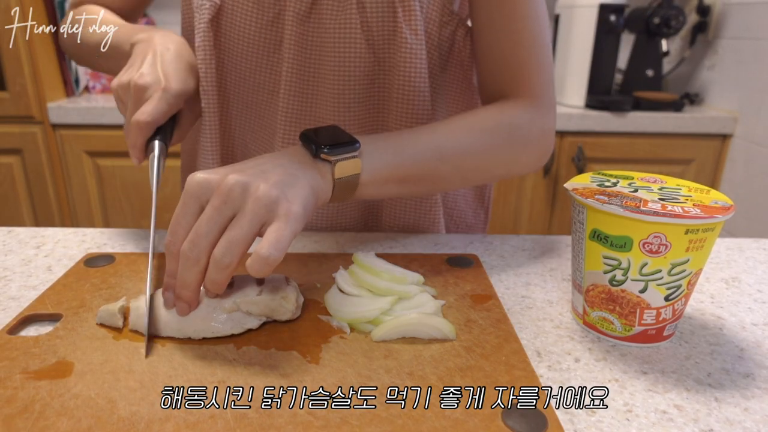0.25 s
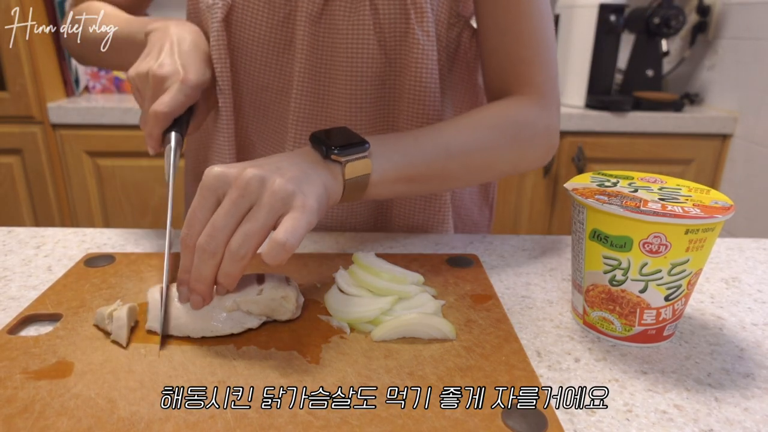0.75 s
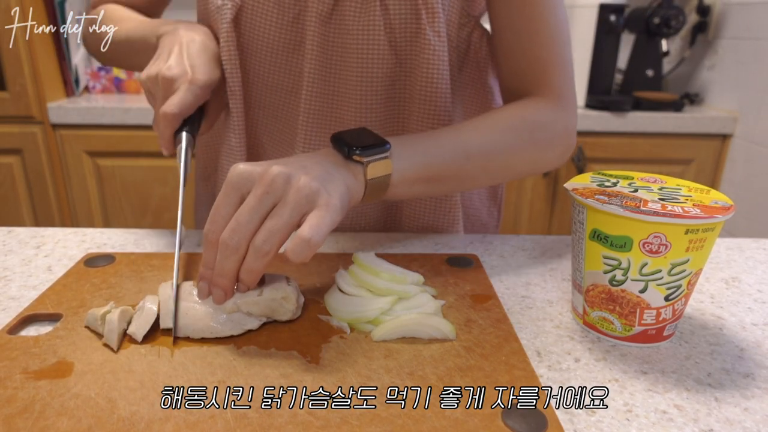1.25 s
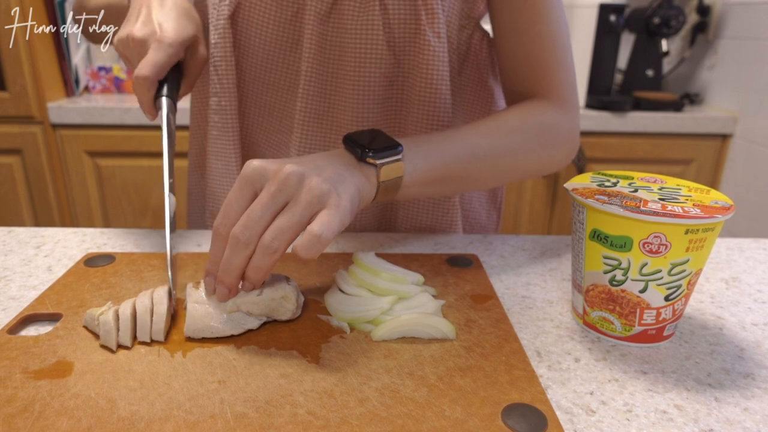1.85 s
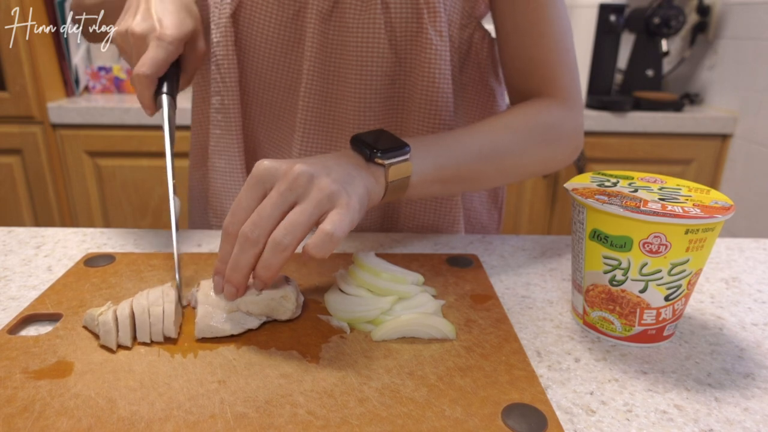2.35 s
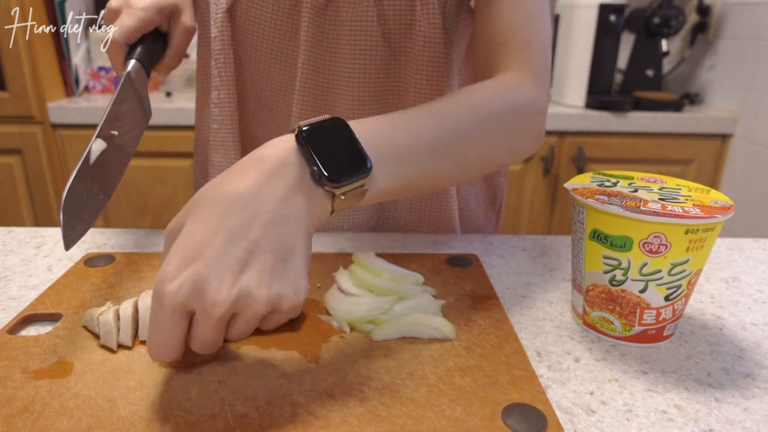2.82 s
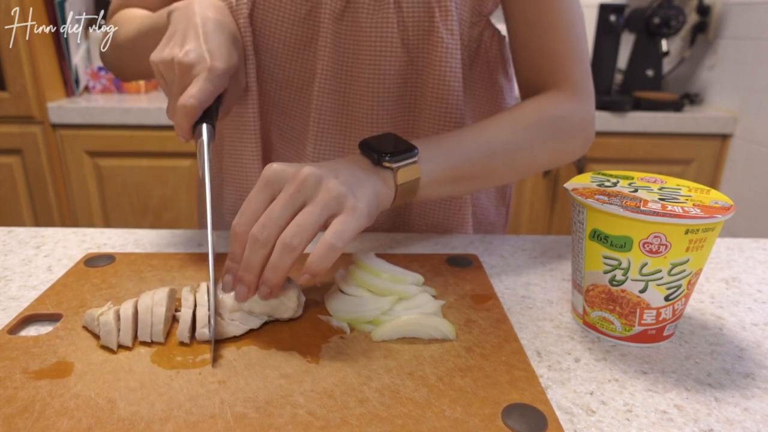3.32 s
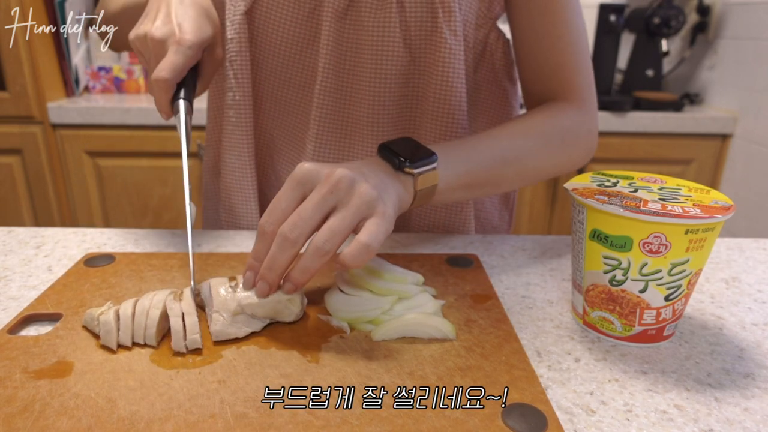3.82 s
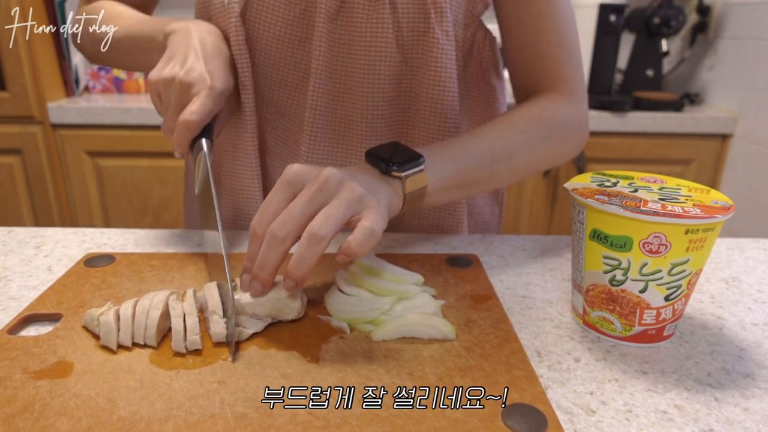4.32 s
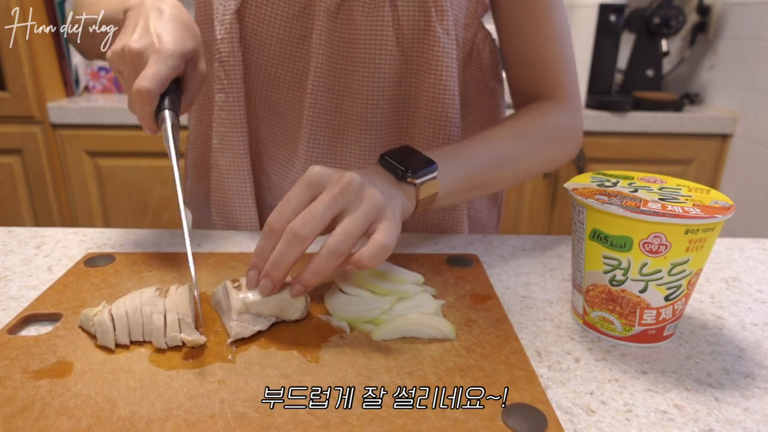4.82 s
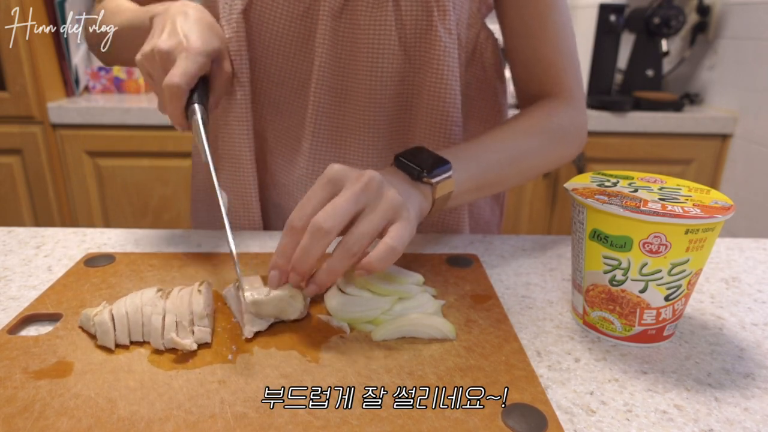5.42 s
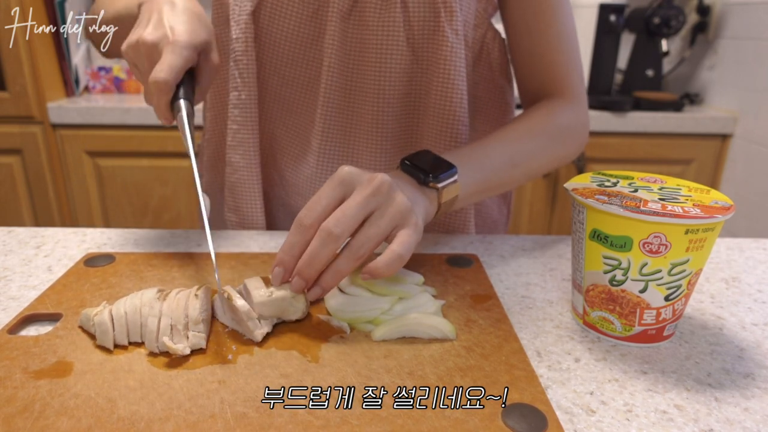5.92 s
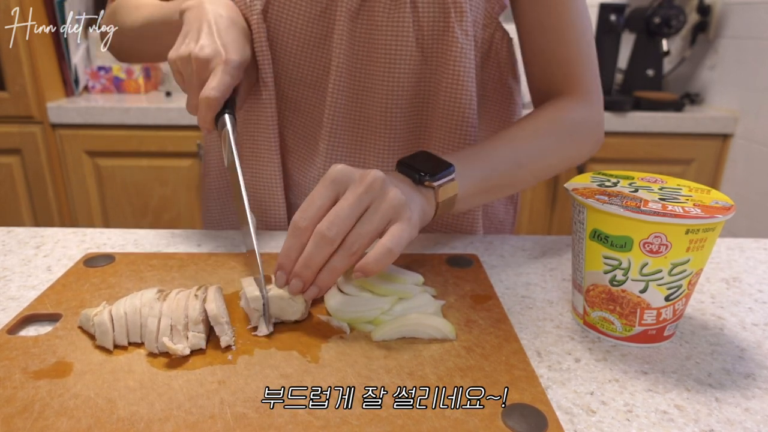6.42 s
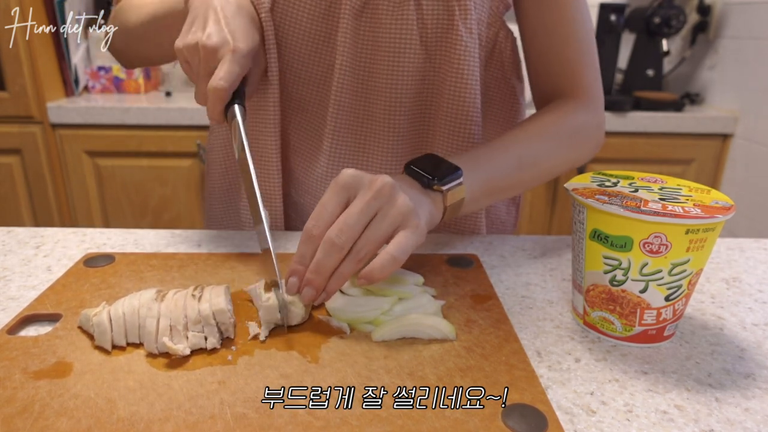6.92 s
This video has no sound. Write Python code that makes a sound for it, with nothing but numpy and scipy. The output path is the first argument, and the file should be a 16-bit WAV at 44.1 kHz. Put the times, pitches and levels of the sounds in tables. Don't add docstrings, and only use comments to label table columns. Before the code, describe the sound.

Close, dry slicing in a small quiet kitchen: the thin steel edge clicks onto the board, drags with short high rasps, and snaps through each slice. Five or six regular cuts, a lull with only tiny grazes, then firmer, busier cuts with light counter thumps. Blade and board ring only briefly. A refrigerator motor murmurs and whines very quietly under a soft wash of air.

```python
import sys
import numpy as np
from scipy import signal
from scipy.io import wavfile
from scipy.ndimage import uniform_filter1d

SR = 44100
rng = np.random.default_rng(int(sys.argv[2]) if len(sys.argv) > 2 else 0)


def file_out(sig):
    cols = np.atleast_2d(sig).T
    lim = np.clip(cols, -1, 1)
    pcm = np.round(lim * 32767).astype(np.int16)
    wavfile.write(sys.argv[1], SR, pcm)


def invert_db(x):
    u = np.asarray(x, float) / 20
    return 10 ** u


N = 315753


def evened(x):
    return x / np.sqrt(np.mean(x ** 2) + 1e-20)


def read(points, hz):
    f, value = np.transpose(points)
    return np.interp(np.log(hz + 1), np.log(f + 1), value)


def slow(rate, count):
    knots = rng.standard_normal((count, 300))
    return np.array([np.interp(np.arange(N) / SR * rate, np.arange(300), row) for row in knots])


# pitch in Hz, strength in dB per Hz.
AIR = [(30, 3), (100, -22.5), (173, -40.5), (220, -32.5), (280, -29), (613, -10.5), (684, -10),
       (1260, -14.5), (1570, -14.5), (1820, -18.5), (4270, -19.5), (6600, -19.5), (9990, -29.5),
       (12500, -31), (15100, -32.5), (16500, -42)]
# pitch in Hz, likeness up to 1.
AIR_SAME = [(60, 0.99), (180, 0.17), (550, 0.78), (1650, 0.72), (3000, 0.7), (4970, 0.46), (7000, 0.5),
            (10000, 0.53), (15000, 0.6)]
# pitch in Hz, width in Hz, level in dB rms.
CASING = [(755.6, 13, -71.5), (467, 16, -81.5), (890, 26, -80), (2244, 180, -74.5), (6570, 220, -76.5)]


def air():
    air_db, stir_s, stir_low_db, stir_high_db = -64.5, 0.055, 1.5, 8
    frames, hz = N // 256 + 5, np.fft.rfftfreq(1024, 1 / SR)
    a, b, c, d, patches = rng.standard_normal((frames, 513, 5)).T
    patches = evened(uniform_filter1d(uniform_filter1d(patches, 14, 0), 10, 1))
    same, left = np.clip(read(AIR_SAME, hz), -1, 1)[:, None], a + 1j * b
    right = same * left + np.sqrt(1 - same ** 2) * (c + 1j * d)
    power = invert_db(read(AIR, hz)) ** 2
    power = power / power[hz > 900].sum() * invert_db(air_db) ** 2
    power = power / (1 + (190 / (hz + 1)) ** 6)
    for f, width, db in CASING:
        peak = np.exp(-((hz - f) / width) ** 2)
        power = power + invert_db(db) ** 2 * peak / peak.sum()
    t = np.arange(frames) * 256 / SR
    stir = np.minimum(sum(np.exp(-((t - row[0]) / stir_s) ** 2) for row in SAWS + FLICKS), 1)
    high = np.clip((hz[:, None] - 4000) / 5000, 0, 1)
    drift_db = ((1 - high) * stir_low_db + high * stir_high_db) * stir
    z = np.array([left, right]) * np.sqrt(power)[:, None] * invert_db(1.1 * patches + drift_db)
    wash = signal.istft(z, nperseg=1024, noverlap=768)[1][:, :N]
    return evened(wash) * np.sqrt(power.sum()) * invert_db(0.11)


# pitch in Hz, share that throbs from 0 to 1.
HUM = [(60.25, 1), (228.92, 0), (238.28, 0), (689.8, 1), (749.7, 0), (1429.7, 0)]
HUM_DB = [-103, -87.5, -96.5, -66.5, -71.5, -82]
HUM_WAVER_DB = np.array([3, 1, 1, 1.3, 2.5, 1.5])
# time in seconds, gain of the throb in dB.
LOAD = [(0, -2), (.15, 2.5), (.7, -3), (1.4, 0), (2.2, 0.5), (3.1, -1.5), (3.42, 5), (3.7, -1.5), (3.92, 3),
        (4.6, -2.5), (5.1, 1.5), (5.42, 4), (5.6, -3), (5.9, 3), (6.4, -0.5), (7.05, 1), (7.16, 11)]
# time in seconds, beats ahead of steady.
THROB_LEAD = [(0, 0), (1.4, -.1), (1.9, -.02), (4.2, .64), (5.3, .36), (7.16, -.38)]
# middle in seconds, half length in seconds, level in dB rms.
WHINE = [
    (0.0, 0.21, -82),
    (1.044, 0.1, -80),
    (1.726, 0.2, -78),
    (2.385, 0.17, -78),
    (4.69, 0.13, -76.5),
    (5.173, 0.1, -78),
    (6.45, 0.75, -79),
]


def compressor():
    throb_per_s, whine_hz = 6, 1582.4
    t = np.arange(N) / SR
    beats = throb_per_s * t + np.interp(t, *np.transpose(THROB_LEAD))
    throb = invert_db(np.interp(t, *np.transpose(LOAD))) * np.sqrt(2) * np.cos(np.pi * beats)
    wavers = np.array(HUM_WAVER_DB)[:, None] * slow(4.05, count=len(HUM))
    hum = 0
    for (hz, share), db, waver in zip(HUM, HUM_DB, wavers):
        hum = hum + invert_db(db + 0.65 + waver) * (1 - share + share * throb) * np.sin(2 * np.pi * hz * t)
    swells = sum(invert_db(db + 7.5) * np.exp(-((t - s) / half) ** 4) for s, half, db in WHINE)
    whine = swells * np.sin(2 * np.pi * whine_hz * t)
    return hum + whine * invert_db(2.6 * slow(13, count=1)[0])


# time in seconds, level in dB, swell in ms, fade in ms,
# steel against board in dB.
FLICKS = [(0.0, -31.5, 19, 4.5, -5), (0.022, -46, 2, 2.7, -10), (0.444, -36, 13, 9.3, -3),
          (.901, -43.5, 9.3, 19, 0), (.932, -34, 12, 8.2, -2), (1.38, -33, 4.6, 11.6, -7),
          (1.85, -36, 5.9, 9.6, -1), (2.265, -45.5, 19, 3.9, -2), (2.427, -36.5, 9.8, 3.2, -7.5),
          (.87, -67, 12, 10, 4), (3.591, -32, 6, 5.9, -5), (3.866, -41, 12, 9, -2),
          (3.89, -43, 12, 3.3, -7.5), (4.524, -32.5, 7.7, 2.9, -2.5), (5.357, -32.5, 11, 8.6, -5.5),
          (5.374, -35, 15, 3.2, -7.5), (5.86, -26, 4.6, 1.6, 0.5), (6.183, -42, 4.7, 11, -10),
          (6.208, -34, 7.9, 3.9, -8), (6.675, -35.5, 8.4, 9.6, -9), (6.71, -38, 19, 5.1, -1),
          (7.126, -40.5, 7.9, 7.4, -4), (7.159, -27.5, 3.1, 32, -8.5)]
FLICK_BLADE_DB = [-7.5, 0, -4, -4, -3, -2, 0, -3, -5, 0, 4, -6, 9, -12, 0, -4, 3, 2, 7.5, 12, -11, 3, 9]
FLICK_THUD_DB = [0, 0, 0, 0, 1, 0, 2, 0, 2, 0, 0.65, 1, 1.2, -0.48, -1, -1, -1, 0, -0.17, 0, 0.23, 0, 0]
# time in seconds, level in dB,
# swell and fade in ms, steel against board in dB.
GRAZES = [(0.054, -55, 9.4, 2), (.178, -70, 10, 9), (.4, -97, 6.5, -18), (.675, -67, 11, 18),
          (1.169, -68, 16, 12), (1.772, -50, 16, -3), (2.304, -51, 4.1, -4.5), (2.57, -72, 8, -6),
          (2.68, -69, 10, -2), (2.92, -73, 8.9, 11), (3.17, -73.5, 13, 3), (3.263, -61.5, 10, 4),
          (3.569, -52, 11, -7), (3.68, -69, 11, 6), (4.155, -65, 8.2, 2), (4.502, -49, 11, -14),
          (4.556, -56, 12, -3), (4.68, -76, 8.7, 17), (4.93, -77, 9.2, 6), (5.084, -61.5, 9, 2.5),
          (4.218, -69, 19, -2), (5.595, -63, 7.5, 0), (6.135, -59, 7.5, -5), (5.714, -48.5, 6.5, -2),
          (5.834, -44, 15, -7), (6.155, -48, 4.9, -7), (6.41, -68, 22, 24), (6.585, -41, 5.8, -9),
          (6.93, -72, 49, 4), (7.085, -48, 12, -8), (5.165, -43, 3.4, -10), (.896, -39.5, 3, -8)]
# time in seconds, level in dB, swell in ms, steel against board in dB,
# extra blade ring in dB.
SAWS = [(0.307, -37, 9.2, 0.5, -0.5), (0.346, -40.5, 7.3, 0, -3), (0.382, -37, 8.4, -1, -11),
        (0.392, -46, 2.3, -4, -6), (.401, -43.5, 2.5, -9, 3), (0.786, -46, 7, -8, 8),
        (.8, -38.5, 7, -2.5, -0.5), (0.814, -40, 5, 2, -4), (0.825, -36.5, 2.9, -3, -15),
        (0.848, -45, 14.5, -3.5, -3), (1.286, -41.5, 7.4, -1, 5), (1.307, -37, 9.7, -5, -10),
        (1.327, -40.5, 12, -1.5, -9), (1.349, -44.5, 6.5, -5, 0), (1.73, -50.5, 14, -3.5, 1),
        (1.797, -45.5, 9.2, -2, -4), (2.208, -41, 13, -6, 7.5), (2.229, -41, 8.5, -3.5, -10),
        (3.383, -42, 16, -4, 5), (3.451, -40, 8.2, -3.5, -3.5), (3.488, -45, 4.7, -7, -4),
        (3.526, -42, 11, -6, 5), (4.272, -37, 4, -1.5, 10.5), (4.323, -35.5, 6.4, -4, 6.5),
        (4.416, -39, 9.6, -2, -6), (4.467, -37.5, 9.7, -6, -8), (5.213, -41, 9, -3, 6),
        (5.232, -48.5, 8, -9, 6), (5.274, -36.5, 11.5, -7, -10), (5.298, -34.5, 12, -3.5, 5),
        (5.788, -39.5, 5.1, -4.5, -10), (5.816, -38.5, 6.4, -8, -5), (6.109, -44, 13, -8.5, 7),
        (6.534, -36, 8.4, -8, 3), (6.556, -35.5, 6.8, -4, -8), (6.617, -44, 9.8, -2.5, -12),
        (6.636, -38, 8.7, -5.5, 4), (6.69, -40, 11, 1, -6), (7.107, -34.5, 10.8, -4.5, -10)]


def drags():
    saw_fade_share, saw_thud_db = 0.64, -8
    skids = []
    for s, _, tap_blade_db, _, db in TAPS:
        blade_db = 7 + 0.25 * tap_blade_db
        skids.append((s + 0.013, db, 5.5, 7.8, -4.5, blade_db, 0))
    saws = [(s, db, ms, saw_fade_share * ms, steel_db, blade_db, saw_thud_db)
            for s, db, ms, steel_db, blade_db in SAWS]
    flicks = [(*flick, blade_db, thud_db)
              for flick, blade_db, thud_db in zip(FLICKS, FLICK_BLADE_DB, FLICK_THUD_DB)]
    grazes = [(s, db, ms, ms, steel_db, 0, saw_thud_db) for s, db, ms, steel_db in GRAZES]
    return skids + saws + flicks + grazes


def slips():
    grit_per_s, grit_spread_db, judder_db = 8000, 1.5, 1.5
    t, power = np.arange(0, N, 32) / SR, 0
    for s, db, swell_ms, fade_ms, steel_db, blade_db, thud_db in drags():
        shape = np.exp(-((t - s) * 1000 / np.where(t < s, swell_ms, fade_ms)) ** 2)
        touch = max(tap[0] for tap in [(-1,)] + TAPS if tap[0] < s)
        shape = shape * ((t >= touch) | (s - touch > .03))
        blade_db = steel_db - 1 + blade_db
        edge_db = 1.42 * steel_db
        thud_db = thud_db - 17.5 + 0.5 * (s - 3)
        share = invert_db(np.array([0, blade_db, edge_db, thud_db])) ** 2
        power = power + invert_db(db + 0.5) ** 2 * share[:, None] / share.sum() * shape
    pressure = np.array([np.interp(np.arange(N) / SR, t, row) for row in np.sqrt(power)])
    size = invert_db(grit_spread_db * np.minimum(rng.exponential(1, N), 4)) * (rng.random(N) < grit_per_s / SR)
    unsteady = rng.standard_normal(N) + 2.0 * rng.standard_normal((4, N))
    judder = invert_db(judder_db * evened(uniform_filter1d(unsteady, 130)))
    grit = size * judder * (rng.standard_normal(N) + 0.98 * rng.standard_normal((4, N)))
    return pressure * grit / np.sqrt(np.mean(grit ** 2))


# time in seconds, peak in dB, blade against board in dB,
# edge against board in dB, level of the skid that follows in dB.
TAPS = [(0.2724, -23.5, 3, -1.5, -43), (0.7376, -27, 1.5, -14, -43), (1.2306, -35.5, -16, -10, -38.5),
        (1.666, -30, -2, -9, -39), (2.1444, -29.5, -5, -17, -38.5), (2.3967, -16.5, -16, -7.5, -38),
        (3.3278, -23, 0.5, -3.5, -39), (3.8246, -33, -36, -33, -44.5), (4.233, -21.5, 1.5, -3.5, -41.5),
        (5.1546, -37, -13, -20, -36.5), (5.6117, -25, 1.5, -10.5, -60), (5.673, -24, -3, -22, -45),
        (5.7491, -21, -9, -14.5, -54), (6.069, -23, -4, -16, -62), (6.484, -19.5, -6, -17.5, -43),
        (6.975, -22, 6.5, -8.5, -40), (7.0398, -20.5, -7, -14.5, -63)]
# time in seconds, peak in dB, blade against board in dB,
# edge against board in dB.
NICKS = [(0.417, -35, -8, -8), (0.3103, -41, -6, 3), (.918, -34, -8, -6), (0.9298, -33, -4, 2),
         (0.933, -39, 13, -6), (.946, -24.5, -3.5, -21), (1.2526, -32, 5.5, 0.5), (1.3751, -23.5, -22, -15),
         (1.38, -39, -15, -14), (1.389, -27, -16, 3.5), (2.4025, -49, -10, -12), (2.416, -23, -21, -6),
         (3.5154, -29.5, -17, -15), (4.5165, -37, -23, -4), (4.5247, -28, -24, -8), (5.285, -28, -19, -15),
         (5.349, -31, 6, -10), (5.339, -34, -2, -10), (5.3645, -23, -17, -12), (5.852, -25, 3, -18),
         (5.8628, -30, -7, 7), (6.532, -32, -5, -12), (6.558, -38, -10, -2), (6.588, -46, -15, -10),
         (6.616, -30, -14, -10), (6.6737, -22, -7, -13), (6.715, -22.5, -6.5, -9), (7.0995, -40, -18, -14),
         (1.8442, -29, -18, -1), (2.7, -56.5, 13, 10), (3.436, -37, -3, 2), (4.3057, -28, -7, -30),
         (4.397, -30, -41, -21), (5.7922, -24, -15, -18), (5.8106, -40, -14, -11),
         (5.8469, -17.5, -2.5, -26), (6.2032, -24.5, -10, -24), (6.2094, -25.5, -13, -7)]


def taps():
    blows = []
    for s, db, blade_db, edge_db, _ in TAPS:
        thud_db = -12 - 0.18 * s - 0.3 * max(db + 31, 1)
        blows.append((s, db, blade_db, edge_db, thud_db))
    blows += [(*nick, -18.5) for nick in NICKS]
    force = np.zeros((4, N + 64))
    for (s, db, *rest_db), chatter in zip(blows, rng.standard_normal((len(blows), 4, 64))):
        blow = 0.09 * chatter * np.exp(-np.arange(64) / 20)
        blow[:, 0] = 1
        force[:, round(s * SR):][:, :64] += blow * invert_db(db + 10.0 + np.array([0, *rest_db]))[:, None]
    return force[:, :N]


def crack(modes, contact_s, spread_s):
    t = np.arange(200) / SR
    lags = contact_s + spread_s * rng.standard_normal(len(modes))
    y = 0
    for (hz, width, db), lag in zip(modes, lags):
        y = y + invert_db(db) * np.sqrt(width) / hz ** 0.38 * np.cos(2 * np.pi * hz * (t - lag))
    y = y * t ** 2 * np.exp(-2 * t / contact_s)
    return y / np.linalg.norm(y)


def ring(force, modes, grip, bend):
    weight, out = np.sqrt(sum(invert_db(db) ** 2 * width for hz, width, db in modes)), 0
    for k, ((hz, width, db), hold, shift) in enumerate(zip(modes, grip, bend)):
        r = np.exp(-np.pi * width / SR)
        turn = np.exp(2j * np.pi * np.cumsum(hz * (1 + shift) * np.ones(N)) / SR)
        gain = (-1) ** k * invert_db(db) * np.sqrt(width) / weight * np.sqrt(2 * (1 - r * r))
        swing = signal.lfilter([1], [1, -r], force * hold * turn.conj() + 1e-18)
        out = out + gain * (turn * swing).imag
    return out


def low_cut(x, hz, order):
    return signal.sosfilt(signal.butter(order, hz, "highpass", fs=SR, output="sos"), x)


def thumps(pushes, modes):
    force = np.zeros(N + 2000)
    for (s, db, push_ms), shake in zip(pushes, rng.standard_normal((len(pushes), 2000))):
        push = np.hanning(min(int(push_ms * SR / 500), 1999))
        force[round(s * SR) - len(push) // 3:][:len(push)] += invert_db(db + 15.5) * push * shake[:len(push)]
    return ring(force[:N], modes, np.ones(len(modes)), np.zeros(len(modes)))


# thud in dB, lowest board ring in dB,
# lowest blade rings in dB.
SPOTS = [(0, -19, -2), (-1, -0.5, -3), (-2.5, 2, -4), (0, 0, -5), (2, 2.5, -7), (0, 5, 8.5), (1, 3, -4),
         (1, 7, 3), (2, 1, 1), (-2, 0.5, -2), (6, -1, 2), (3, -1, 1), (-3.5, -1, -2), (-2, 4, -9),
         (-0.5, -3.5, -10), (7, -4, -5), (-0.5, -5, -7)]
SPOT_EDGE_DB = [0, -0.5, -2, -1, -1.5, -1.5, -1, 1.5, 1, 0, 6, -2.5, 2, -1.5, -2, 1, -3]


def spots():
    cut = np.maximum(np.searchsorted([tap[0] - .01 for tap in TAPS], np.arange(N) / SR) - 1, 0)
    thud_db, board_db, blade_db = np.transpose(SPOTS)[:, cut]
    edge_db = np.take(SPOT_EDGE_DB, cut)

    def lowest(modes, count):
        return (np.arange(len(modes)) < count)[:, None]

    return (lowest(BOARD, count=1) * board_db, lowest(BLADE, count=2) * blade_db,
            lowest(EDGE, count=4) * edge_db, thud_db)


# pitch in Hz, width in Hz, level in dB.
BOARD = [(3075, 74, -5.5), (3534, 121, 1), (3721, 143, 2), (3833, 166, 5), (4166, 387, -6.5),
         (4317, 90, -3.5), (4810, 390, -13)]
# pitch in Hz, width in Hz, level in dB.
BLADE = [(5280, 330, -6), (5920, 290, -2), (6316, 70, 8.5), (6605, 350, 9.5), (6560, 1900, 1),
         (7366, 560, 4), (6840, 230, -3.5)]
# pitch in Hz, width in Hz, level in dB.
EDGE = [(8870, 415, 4), (9260, 130, 5), (9274, 89, -2), (9525, 205, 4), (10390, 490, -0.5),
        (11430, 530, -4), (12250, 350, -4.5), (14700, 1500, -9), (15400, 180, -10.5), (16400, 1200, -23)]
# pitch in Hz, width in Hz, level in dB.
THUD = [(1424, 1200, -8.5), (1528, 110, 1), (2116, 79, 2.5), (1840, 340, -22.5)]
WALK_DB = [
    [7.5, -5, -6.5, -0.5, 7.5, 8, 4.5],
    [-23.5, -26.5, 3.5, 3, -3.5, -12.5, 13],
    [-0.5, -6.5, 3, 1.5, 4, -1, 2, 2.5, 11, -13],
    [2, -14, -7, -4],
]
GRIP_DB = [1.4, 1.8, 2.2, 2]
CRACK_DB = [-.5, -7, -6.5, -6]
WANDER = [0.017, 0.023, 0.014, .02]
# time in seconds, level in dB, push in ms.
THUMPS = [(.272, -77, 1.6), (.94, -87, 21), (1.39, -78, 22), (1.855, -85, 16.3), (2.41, -76, 24.4),
          (3.328, -67, 3.8), (3.6, -91, 9.85), (4.234, -62, 4.3), (4.325, -74.5, 15), (4.525, -77, 14),
          (5.36, -68.5, 19.3), (5.613, -65, 4.3), (5.675, -63, 2.1), (5.751, -69.5, 4.4),
          (5.86, -69, 10.06), (6.071, -61, 3.66), (6.21, -71, 24), (6.485, -65, 4.1), (6.7, -69, 30),
          (6.977, -64, 4), (7.042, -62.5, 3.2)]
# pitch in Hz, width in Hz, level in dB.
COUNTER = [(440, 310, -9.5), (595, 176, -3), (710, 126, 8), (1060, 470, -3.5), (1106, 96, 1)]
# time in seconds, level in dB, push in ms.
KNOCKS = [
    (.945, -83, 8),
    (3.6, -77.5, 7.5),
    (5.865, -74, 8),
    (6.21, -77.5, 9.3),
    (6.7, -90, 15),
]
# pitch in Hz, width in Hz, level in dB.
ROCK = [(1040, 120, -1), (1164, 120, -2.5), (940, 160, -7)]


def knife():
    nick_crack_db = -7
    parts, landing = [], np.zeros(N)
    landing[(np.round(np.array(TAPS)[:, :1] * SR) + np.arange(64)).astype(int)] = 1
    sharp = landing + (1 - landing) * invert_db(nick_crack_db)
    for blow, grit, modes, walk_db, grip_db, crack_db, spot_db, wander in zip(
            taps(), slips(), (BOARD, BLADE, EDGE, THUD), WALK_DB, GRIP_DB, CRACK_DB, spots(), WANDER):
        hand = slow(24, count=len(modes))
        walk = np.outer(walk_db, np.arange(N) / N - .5)
        grip = invert_db(grip_db * hand + 1.0 + walk + spot_db)
        cracks = signal.oaconvolve(blow * sharp, crack(modes, 0.00052, .00003))[:N]
        rings = ring(0.93 * blow + grit, modes, grip, wander * hand[:, ::-1])
        parts.append(invert_db(crack_db) * cracks + rings)
    bright = low_cut(sum(parts[:3]), 3030, order=6)
    thud = low_cut(parts[3], 1810, order=3)
    return bright + thud + low_cut(thumps(THUMPS, COUNTER) + thumps(KNOCKS, ROCK), 414, order=3)


# pitch in Hz, time to fade by 60 dB in seconds.
ROOM = [(1000, 0.25), (2000, 0.23), (3600, 0.099), (6000, 0.11), (10000, 0.081), (15000, 0.14)]
ECHO_S = [.0028, .0058, .009]
ECHO_DB = [-9.5, -11.5, -16.5]


def kitchen(x):
    room_db = -4
    at = np.arange(160, 9000, 20) + rng.integers(0, 20, (6, 442))
    sparse = np.zeros((6, 9100))
    np.put_along_axis(sparse, at, rng.choice([-1., 1.], at.shape), 1)
    sparse = sparse[[0, 0, 1, 1]] + 0.2 * sparse[2:]
    hz, t, z = signal.stft(sparse, SR, nperseg=128)
    tail = signal.istft(z * invert_db(-60 * t / read(ROOM, hz)[:, None]), SR, nperseg=128)[1]
    answer = invert_db(room_db) * tail / np.linalg.norm(tail[0])
    answer[:, 0] += 1
    dull = .5 ** np.arange(1, 31)
    scatters = rng.standard_normal((len(ECHO_S), 4, 30)) * np.exp(-np.arange(30) / 8)
    for delay, db, scatter in zip(ECHO_S, ECHO_DB, scatters):
        bounce = dull + 0.19 * uniform_filter1d(scatter, size=2)
        answer[:, round(delay * SR):][:, :30] += invert_db(db) * bounce
    place = np.sin(np.pi * 1.7 * np.arange(N) / SR) ** 2
    placed = x * np.array([place, place, 1 - place, 1 - place])
    heard = signal.oaconvolve(placed, answer, axes=1)[:, :N]
    return heard[:2] + heard[2:]


def scene():
    return kitchen(knife()) + air() + compressor()


def band_limit(x):
    return signal.sosfilt(signal.butter(12, 16990, fs=SR, output="sos"), x)


def record(dry):
    edge_hz, leak_db = 15850, -19
    lowpass = signal.firwin(301, edge_hz, window=("kaiser", 6), fs=SR)
    limited = signal.oaconvolve(dry, lowpass[None], "same")
    power = (dry ** 2).mean(0)
    jump = uniform_filter1d(power, size=128) / (uniform_filter1d(power, size=2048) + 1e-9)
    sharp = np.clip(jump / 4 - 1, 0, 1)
    mix = limited + invert_db(leak_db) * sharp * (dry - limited)
    return band_limit(mix)


dry = scene()
out = record(dry)
file_out(out)
```